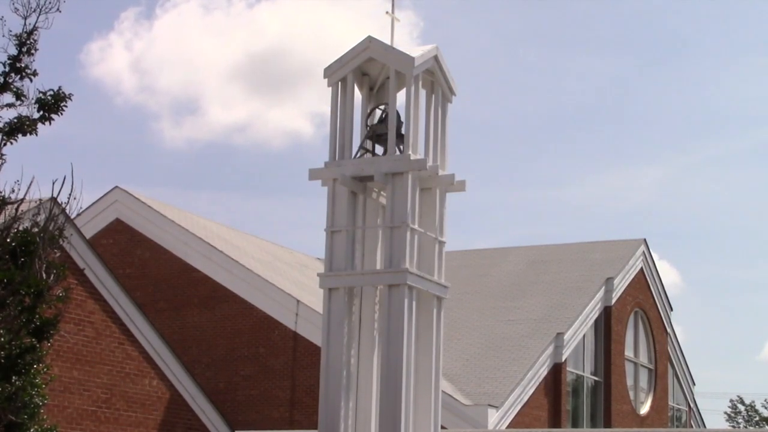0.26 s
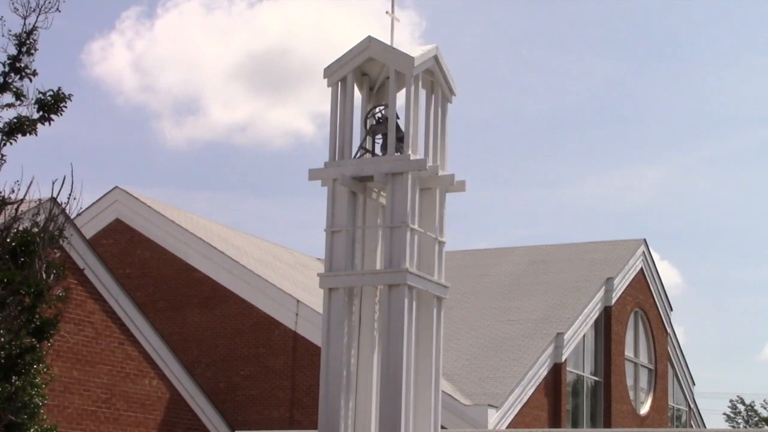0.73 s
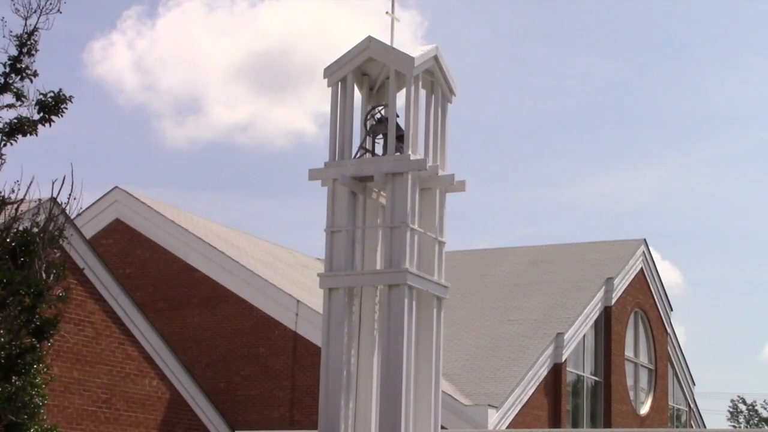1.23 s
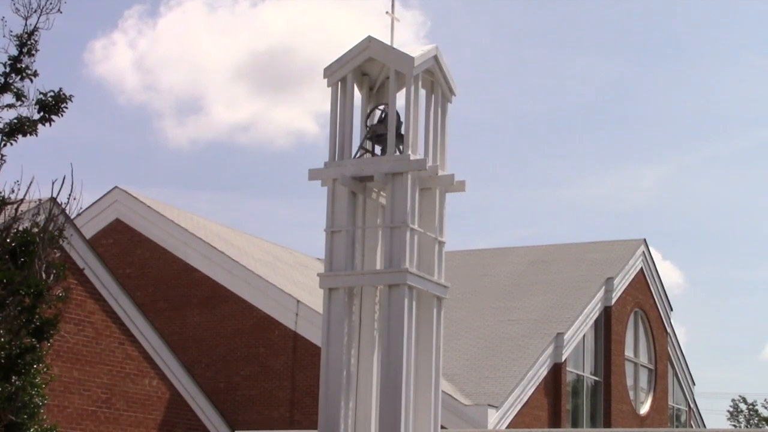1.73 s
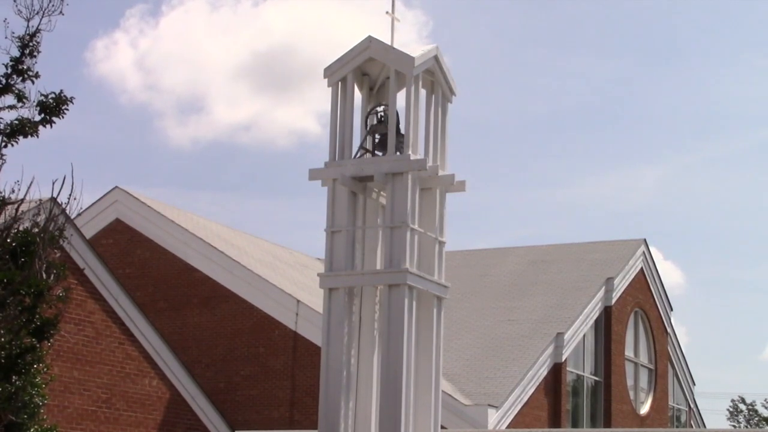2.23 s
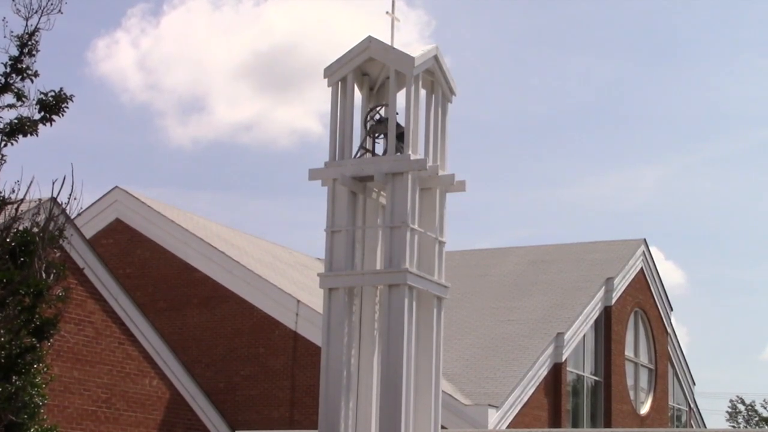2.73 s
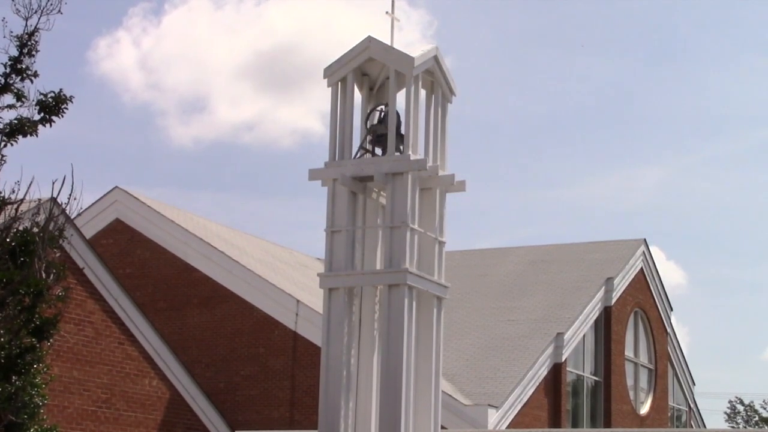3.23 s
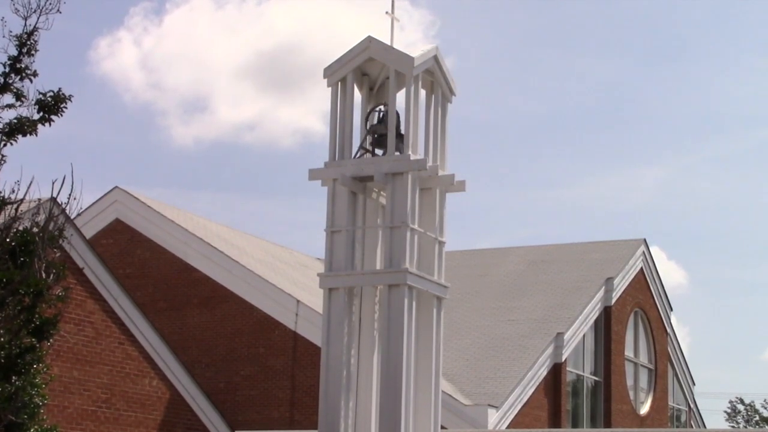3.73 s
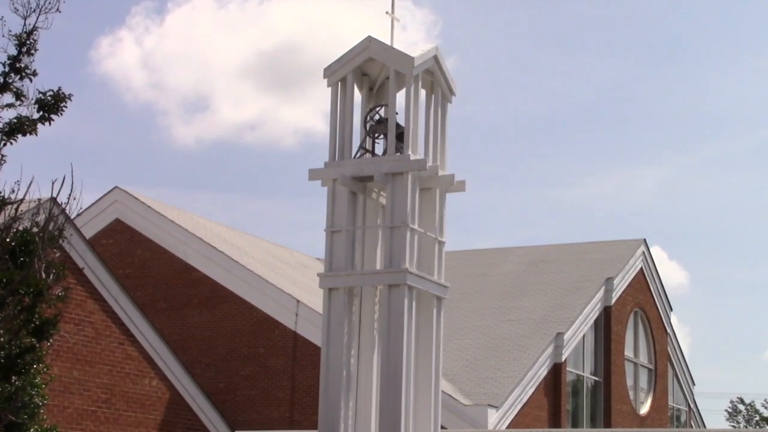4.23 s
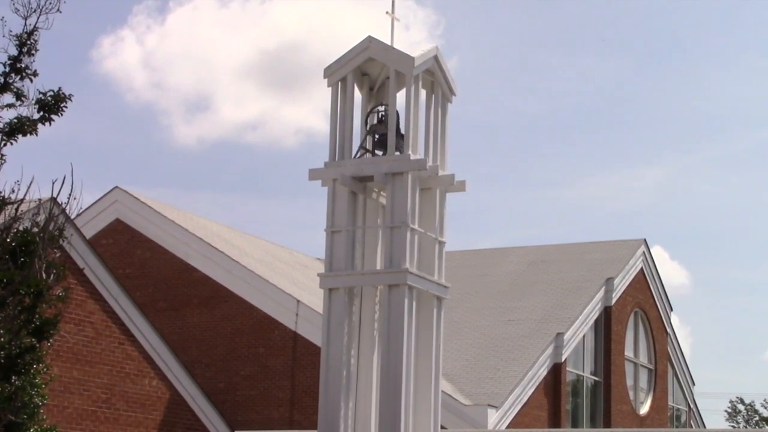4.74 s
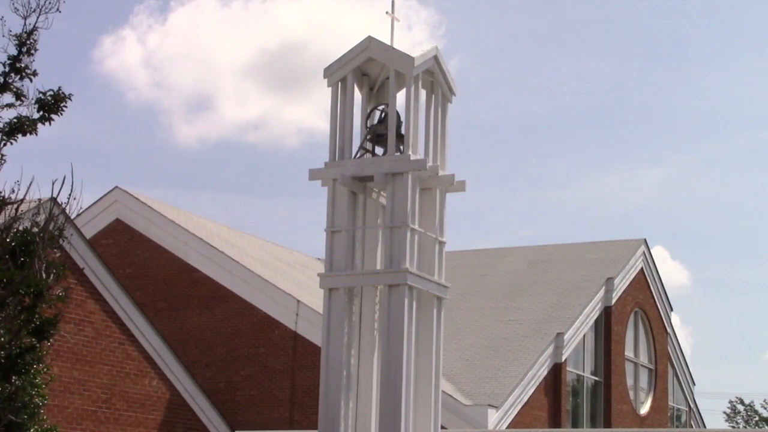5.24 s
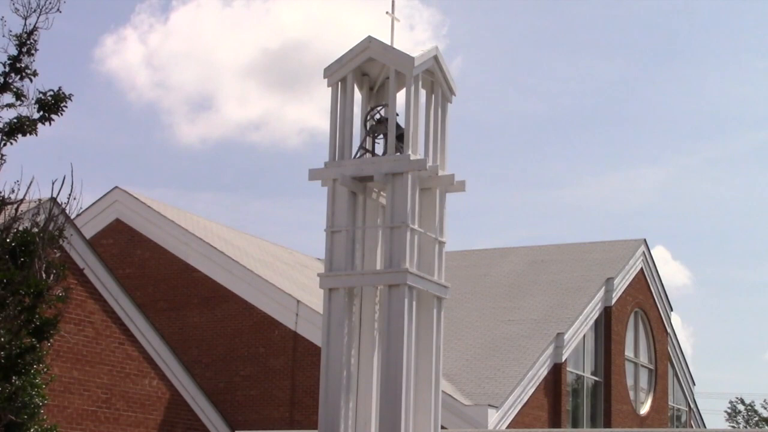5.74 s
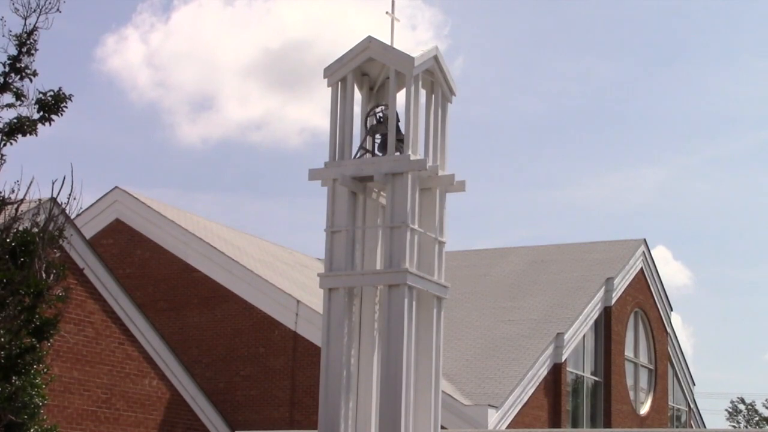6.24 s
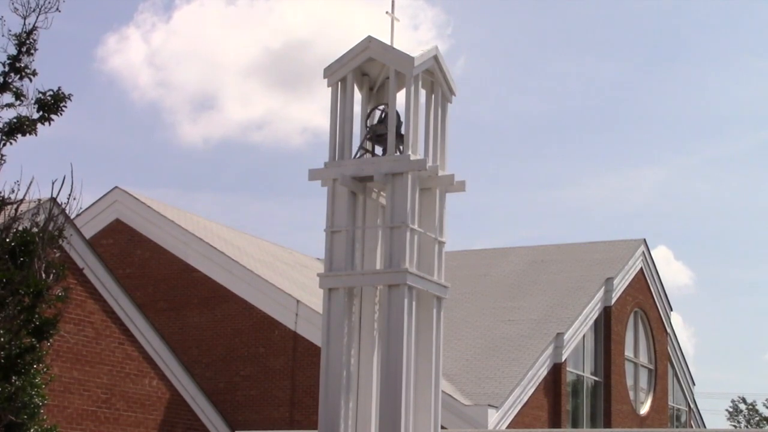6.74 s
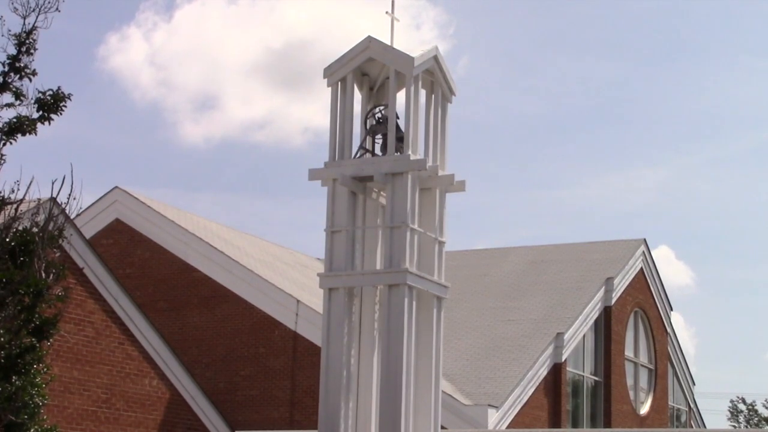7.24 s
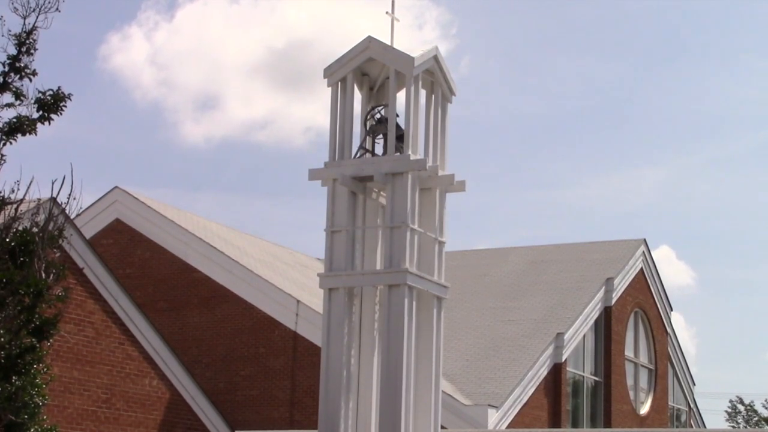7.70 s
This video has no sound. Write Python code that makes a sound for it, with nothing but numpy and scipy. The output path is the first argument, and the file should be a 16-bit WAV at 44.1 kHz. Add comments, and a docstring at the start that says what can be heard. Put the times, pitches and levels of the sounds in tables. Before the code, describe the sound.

A single swinging church bell in an open tower is struck about every 1.6 seconds. The clip opens on the fading ring of an earlier stroke, then five similar blows follow. Each has a hard, bright clang and wavering overtones that flutter off nearby roofs and fade strongly. Heard outdoors from some distance, bell nearly centred; low wind buffets brush the left side, strongest after the last blow.

```python
"""An open church tower, where a bell swings and is struck once a swing.
Its tones are sine waves that swell and dip as their beams sweep past the listener; shifting roof
echoes make the overtones flutter. Shaped noise makes the crash of each blow, the outdoor air and a
light wind, mostly on the left. A noise suppressor lets sound through only in bands that are loud."""
import sys
import numpy as np
from scipy import signal
from scipy.fft import rfft, irfft, next_fast_len
from scipy.io import wavfile
from scipy.ndimage import uniform_filter1d

SR = 44100
rng = np.random.default_rng(int(sys.argv[2]) if len(sys.argv) > 2 else 0)


def unload_audio(sound):
    """Save the sound as a 16-bit wav file, at the path given as the first command line argument."""
    columns = np.transpose(np.atleast_2d(sound))
    # keep every value between -1 and 1, then stretch to whole-number steps
    steps = np.round(np.clip(columns, -1, 1) * 32767)
    wavfile.write(sys.argv[1], SR, steps.astype(np.int16))


N = 351477
TIME = np.arange(N) / SR  # seconds
SWING_S = 1.632  # length of the swing used for the bell's motion
TOP_HZ = 15200  # nearly nothing is heard above this

# the bell's lowest partials, then the strong ones of the strike note
HUM_HZ, PRIME_HZ, TIERCE_HZ, NOMINAL_HZ = 328.6, 653.0, 784.2, 1327.7
NEIGHBOUR_HZ, TWELFTH_HZ, DOUBLE_OCTAVE_HZ, UPPER_FOURTH_HZ = 1749.5, 1995.0, 2747.3, 3566.5

# Clapper blows; each starts the ring anew, with its own strength for the low partials.
# Columns: start_s, level_db, extra_treble_db_per_octave (around 2000 Hz), prime_db, tierce_db, twelfth_db,
# mid_swing_change_db (nominal and twelfth), steady_hum_db, hum_swell_after_blow_s, hum_swell_db,
# hum_swell_width_s
CLAPPER_BLOWS = [(-.645, -.8, 1.2, 5, 2, 0, 0, -30, .89, -18.7, .225),
                 (.985, -.4, 1.3, -5, -6.5, 1, 0, -33.3, 1.14, -23.2, .29),
                 (2.626, .2, .5, -18, -2.5, 0, 0, -33.2, .98, -19.2, .235),
                 (4.257, .3, 0, 0, 0, -3, -6.5, -30.7, .71, -23.2, .21),
                 (5.874, .3, .5, -14.5, -20, .5, 1, -31.2, 1.03, -22.9, .26),
                 (7.515, -.3, -.4, -12, -3.5, -3, -6, -34, 1.0, -22, .23)]
# The bell's other ringing modes, before the level of each blow.
# Columns: pitch_hz, level_db, time_to_fade_60_db_s
OVERTONE_MODES = [(522, -63.3, 9), (914, -60.2, 3.95), (995, -39.6, 3.54), (1071, -41.6, 0.74),
                  (1629, -42.8, 3.07), (1686, -22.9, 1.69), (1795, -32.4, 0.78), (1890, -21.9, 0.59),
                  (2132, -36.9, 9), (2311, -25.7, 0.64), (2480, -37.4, 1.87), (2791, -36.4, 2.06),
                  (2870, -39.2, 4.31), (3058, -41.2, 2.59), (3641, -41.0, 1.93), (3746, -45.8, 2.9),
                  (3809, -45.8, 2.17), (3972, -48.8, 3.1), (4426, -25.0, 3.1), (4453, -36.5, 1.97),
                  (4645, -26.5, .35), (5913, -29, .4), (5299, -26.0, 1.44), (5397, -44.4, 1.55),
                  (5874, -40.6, 1.87), (6198, -30, 2.8), (6305, -42.6, 1.4), (6380, -46.9, 2.29),
                  (7074, -36.3, 1.69), (7428, -40.3, 0.84), (7849, -50.2, 2.3), (7959, -42.1, 1.73),
                  (8860, -43.9, 1.02), (8973, -44.6, 1.05), (9722, -51.3, 1.06)]
# Typical level of one weak high mode, before random scatter and blow level. Columns: pitch_hz, level_db
SHIMMER_LEVELS = [(2800, -55), (4500, -51), (6500, -48), (8800, -51), (10500, -57.5), (12300, -65),
                  (14500, -78)]
# Spectra of a blow's first crash and of its longer wash between buildings, before the blow's level.
# Columns: pitch_hz, level_db_per_hz
CRASH_SPECTRUM = [(300, -104), (800, -84), (1100, -61), (1600, -56), (2800, -61), (4700, -61.5),
                  (7000, -69), (10000, -83.5), (15000, -101)]
WASH_SPECTRUM = [(300, -104), (800, -89), (1100, -69), (1700, -71), (2800, -81), (4500, -90), (7000, -97),
                 (10000, -106), (15000, -118)]
# Spectrum of the outdoor air, before the level of each side. Columns: pitch_hz, level_db_per_hz
AIR_SPECTRUM = [(30, -110), (70, -104), (130, -86), (230, -74), (420, -88), (620, -101), (900, -98),
                (1150, -81), (1500, -81), (2200, -89), (3500, -101), (6000, -118), (15000, -124)]
# Wind buffets, before the level of each side. Columns: start_s, level_db, length_s (peak at half of it)
WIND_BUFFETS = [(1.942, -48, .03), (2.063, -46, .03), (2.32, -47, .03), (2.918, -40, .025),
                (3.882, -46, .03), (5.052, -43, .05), (6.97, -45, .03), (7.083, -41, .04),
                (7.263, -42, .05), (7.347, -27.5, .012), (7.68, -33, .025), (7.697, -26, .05),
                (7.81, -34, .055), (7.89, -36, .045)]
# Tone colour of the wind; only its shape matters. Columns: pitch_hz, level_db
WIND_COLOUR = [(30, -46), (70, -34), (130, -6), (260, 0), (360, -7), (500, -28), (900, -42), (3000, -62)]
# Limits of the noise suppressor's bands. Column: edge_hz
BAND_EDGES_HZ = [0, 480, 930, 1620, 2420, 3300, 4900, 6800, 8300, 10000, 23000]
# Level under which each band begins to close. Column: level_db
BAND_THRESHOLDS_DB = [-29, -75, -29, -27, -33, -36.5, -48, -55, -61, -65]

# Beams of the partials over one swing, before the blow's own levels. Columns of each: after_blow_s, level_db
PRIME_SWEEP = [(0, -44), (.06, -34), (.2, -27.5), (.5, -33), (.7, -44), (.9, -36), (1.18, -48), (1.42, -40),
               (1.63, -45)]
TIERCE_SWEEP = [(0, -44), (.17, -28.5), (.52, -34), (.71, -62), (.92, -42), (1.12, -62), (1.38, -42.5),
                (1.63, -51)]
NOMINAL_SWEEP = [(0, -12), (.18, -17.3), (.31, -28), (.45, -19.5), (.59, -26), (.7, -14.2), (.93, -23),
                 (1.12, -23.8), (1.25, -38), (1.63, -46)]
NEIGHBOUR_SWEEP = [(0, -26), (.32, -24), (.48, -31), (.57, -25.5), (.75, -44), (1.05, -53), (1.22, -42),
                   (1.35, -52), (1.63, -55)]
TWELFTH_SWEEP = [(0, -15), (.27, -15.5), (.36, -22), (.48, -30), (.56, -19.5), (.72, -23), (.83, -35),
                 (.93, -29), (1.01, -36), (1.09, -25.5), (1.21, -24), (1.32, -39), (1.45, -29), (1.63, -43)]
DOUBLE_OCTAVE_SWEEP = [(0, -12.6), (.22, -14.8), (.33, -28), (.49, -23), (.63, -30), (.73, -25.5),
                       (.87, -37), (1.07, -33), (1.18, -45), (1.63, -40)]
UPPER_FOURTH_SWEEP = [(0, -28), (.08, -33), (.2, -24.5), (.33, -24), (.42, -33), (.47, -27), (.63, -37),
                      (.71, -28.5), (.88, -33), (1.15, -46), (1.32, -40), (1.63, -56)]


def blows():
    """For every moment, give the time since the last clapper blow, then that blow's settings."""
    start_s, *columns = np.transpose(CLAPPER_BLOWS)
    last = np.maximum(np.searchsorted(start_s, TIME, side="right") - 1, 0)
    return [TIME - start_s[last]] + [column[last] for column in columns]


def travel(age, reach_m=.13, nearest_s=.08):
    """Sound arrives a little earlier or later (s) as the bell's lip swings nearer and farther."""
    sound_speed = 343  # m/s
    return -reach_m / sound_speed * np.cos(2 * np.pi * (age - nearest_s) / SWING_S)


def strong_partials(age, blow_db, twelfth_db, change_db, delay, rise_s=.018, echo_per_khz=.26,
                    flutter_rate=17, echo_build_s=.35):
    """The strike note swells and dips with its beams; growing echoes make higher partials flutter more."""
    def ring(hz, curve):
        """One partial, with more echo the higher it lies above the nominal."""
        khz_above = (hz - NOMINAL_HZ) / 1000
        build = np.minimum(age / echo_build_s, 1)
        share = np.clip(echo_per_khz * khz_above * build, 0, 1)
        return beam(curve, age) * echoed(hz, delay, share, flutter_rate)

    mid_swing_gain = undb(change_db * lobe(age - .46, .11, .11))
    changing = ring(NOMINAL_HZ, NOMINAL_SWEEP)
    changing = changing + undb(twelfth_db) * ring(TWELFTH_HZ, TWELFTH_SWEEP)
    others = ring(NEIGHBOUR_HZ, NEIGHBOUR_SWEEP)
    others = others + ring(DOUBLE_OCTAVE_HZ, DOUBLE_OCTAVE_SWEEP)
    others = others + ring(UPPER_FOURTH_HZ, UPPER_FOURTH_SWEEP)
    attack = np.clip(age / rise_s, .1, 1)
    return (mid_swing_gain * changing + others) * attack * undb(blow_db)


def echoed(hz, delay, share, rate):
    """A partial mixes with roof echoes that wander in strength and phase."""
    echoes = (waver(rate) + 1j * waver(rate)) * np.exp(2j * np.pi * rng.random())
    direct = np.sqrt(1 - share ** 2)
    turning = np.exp(2j * np.pi * (hz * (TIME - delay) + rng.random()))
    return ((direct + share * echoes) * turning).imag


def overtones(age, blow_db, treble_db, delay, echo=.75, echo_reach=1.9, echo_build_s=.22,
              shimmer_t60=1.45, scatter_db=6.75, rise_s=.014, count=64, size=128):
    """Many modes die away; each beats with its own echoes, whose paths change with the swing."""
    crowd_hz = np.linspace(3100, 14300, count) + rng.uniform(-80, 80, count)
    crowd_db = 20 * np.log10(colour(SHIMMER_LEVELS, crowd_hz))
    crowd_db = crowd_db + rng.uniform(-scatter_db, scatter_db, count)
    crowd_t60 = shimmer_t60 * (6000 / crowd_hz) ** .9  # higher modes fade sooner
    crowd = np.c_[crowd_hz, crowd_db, crowd_t60]
    hz, db, t60 = np.vstack([OVERTONE_MODES, crowd]).T[:, :, None]

    # levels are worked out once per block of samples
    block_age, block_time = age[::size], TIME[::size]
    # four echo paths per mode, each leaving in its own direction and drifting slowly
    angle, phase = rng.uniform(0, 2 * np.pi, (2, 4, len(hz), 1))
    swing_turn = 2 * np.pi * hz * echo_reach * delay[::size] * np.cos(angle)
    turn = swing_turn + phase + block_time * np.sin(angle)
    share = echo * np.minimum(block_age / echo_build_s, 1)
    echoes = np.exp(1j * turn).sum(0) / 2
    flutter = np.abs(np.sqrt(1 - share ** 2) + share * echoes)

    treble = treble_db[::size] * np.log2(hz / 2000)
    decay = np.exp(-np.log(1000) * block_age / t60)
    gain = flutter * undb(db + blow_db[::size] + treble) * decay
    return sines(hz[:, 0], gain, size) * np.minimum(age / rise_s, 1)


def low_partials(age, prime_db, tierce_db, rise_s=.006):
    """Prime and tierce ring on through the swing at the strength set by the last blow."""
    # the bell turns back at the far end and shows the prime's second lobe
    far = undb(-43) * lobe(age - .97, .12, .12)
    prime = np.hypot(undb(prime_db) * beam(PRIME_SWEEP, age), far)
    tierce = undb(tierce_db) * beam(TIERCE_SWEEP, age)
    return smooth(prime, rise_s) * tone(PRIME_HZ) + smooth(tierce, rise_s) * tone(TIERCE_HZ)


def hum(age, steady_db, swell_s, swell_db, width_s, slower_fade=1.2, opposed=2.72, rise_s=.01):
    """A once-a-swing lobe nearly opposes the steady ring in phase (radians), so a dip lies on each side."""
    swell = undb(swell_db) * lobe(age - swell_s, width_s, width_s * slower_fade)
    level = np.abs(undb(steady_db) + swell * np.exp(1j * opposed))
    return smooth(level, rise_s) * tone(HUM_HZ)


def clang(age, blow_db, crash_t60=.3, wash_t60=1.9, rise_s=.013):
    """The clapper's crash fades fast; its scatter from tower and roofs fades more slowly."""
    crash = noise(CRASH_SPECTRUM) * np.exp(-np.log(1000) * age / crash_t60)
    wash = noise(WASH_SPECTRUM) * np.exp(-np.log(1000) * age / wash_t60)
    return (crash + wash) * undb(blow_db) * np.minimum(age / rise_s, 1)


def wind(steady_db=-65):
    """Low, steady turbulence at one microphone port, with short buffets that rise fast and fade."""
    eddies = noise(WIND_COLOUR)
    eddies /= np.sqrt(smooth(eddies ** 2, .02))  # even out the noise's own level
    force = np.full(N, undb(steady_db))
    for start_s, db, length_s in WIND_BUFFETS:
        near = (TIME > start_s) & (TIME < start_s + 10 * length_s)
        progress = (TIME[near] - start_s) / (length_s / 2)
        force[near] += undb(db) * progress * np.exp(1 - progress)
    return eddies * force


def undb(db):
    """Turn decibels into a gain."""
    return 10 ** (np.asarray(db) / 20)


def colour(points, hz):
    """Read a spectrum's gain at any pitch, joining its points evenly by musical interval."""
    point_hz, db = np.transpose(points)
    return undb(np.interp(np.log(hz + 1), np.log(point_hz), db))


def noise(points):
    """Filter white noise to the given spectrum in dB per Hz."""
    size = next_fast_len(N, real=True)
    hz = np.arange(size // 2 + 1) * SR / size
    spectrum = rfft(rng.standard_normal(size)) * colour(points, hz)
    return irfft(spectrum, size)[:N] * np.sqrt(SR / 2)


def smooth(x, seconds):
    """Round off sudden changes by averaging twice."""
    size = max(int(seconds * SR), 1)
    return uniform_filter1d(uniform_filter1d(x, size), size)


def tone(hz):
    """A steady sine wave starting at a random point of its cycle."""
    return np.sin(2 * np.pi * (hz * TIME + rng.random()))


def sines(hz, gain, size):
    """Add steady sines whose gains (modes x blocks) glide from one block of samples to the next."""
    omega = 2 * np.pi * hz[:, None]
    start = np.exp(1j * (omega * TIME[::size] + rng.uniform(0, 2 * np.pi, omega.shape)))
    within = np.exp(1j * omega * TIME[:size])
    change = np.diff(gain, append=gain[:, -1:])
    held = (gain * start).T @ within
    glide = (change * start).T @ (within * np.arange(size) / size)
    return (held + glide).imag.ravel()[:N]


def beam(curve, age):
    """The strength of a partial's beam at this point of the swing."""
    after_blow_s, db = np.transpose(curve)
    return np.interp(age, after_blow_s, undb(db))


def lobe(offset, before_s, after_s):
    """A rounded swell that peaks at offset 0, with its own width on each side."""
    return np.exp(-(offset / np.where(offset < 0, before_s, after_s)) ** 2)


def waver(rate):
    """A wander through random levels, so many a second, joined smoothly."""
    levels = rng.standard_normal(512)
    return smooth(np.interp(TIME * rate, np.arange(len(levels)), levels), .5 / rate)


def scene(left_db=.3, wind_left_db=2, wind_right_db=-12, air_side_db=-12):
    """The bell almost straight ahead, air all round, separate wind eddies at the two ports."""
    age, blow_db, treble_db, prime_db, tierce_db, twelfth_db, change_db, *humming = blows()
    delay = travel(age)
    # the strong partials get half the bell's motion
    bell = strong_partials(age, blow_db, twelfth_db, change_db, delay / 2)
    bell = bell + overtones(age, blow_db, treble_db, delay)
    bell = bell + low_partials(age, prime_db, tierce_db) + hum(age, *humming)
    bell = bell + clang(age, blow_db)
    ahead = (bell + noise(AIR_SPECTRUM)) * undb([[left_db], [-left_db]])
    # opposite signs left and right make this air sound wide
    around = noise(AIR_SPECTRUM) * undb(air_side_db) * np.array([[1], [-1]])
    gusts = np.array([wind() * undb(wind_left_db), wind() * undb(wind_right_db)])
    return ahead + around + gusts


def suppress(x, slope=3.2, depth_db=32):
    """Turn each band down by slope dB for each dB it lies under its threshold, to a limit of depth_db."""
    hz, _, frames = signal.stft(x, SR, "hann", 1024, 896)
    power = np.abs(frames.mean(0)) ** 2 * 4 / 3  # both sides share one control
    gain_db = np.zeros(power.shape)
    for low_hz, high_hz, open_db in zip(BAND_EDGES_HZ, BAND_EDGES_HZ[1:], BAND_THRESHOLDS_DB):
        band = (hz >= low_hz) & (hz < high_hz)
        level_db = 10 * np.log10(power[band].sum(0) + 1e-18)
        gain_db[band] = np.clip(slope * (level_db - open_db), -depth_db, 0)
    gain = undb(uniform_filter1d(gain_db, size=3, axis=0))  # soften the band edges
    return signal.istft(frames * gain, SR, "hann", 1024, 896)[1][:, :N]


def record(dry):
    """Suppress the quiet bands, then cut the very top with a steep low-pass filter."""
    top_cut = signal.ellip(8, .2, 70, TOP_HZ, fs=SR, output="sos")
    return signal.sosfilt(top_cut, suppress(dry))


dry = scene()
out = record(dry)
unload_audio(out)
```